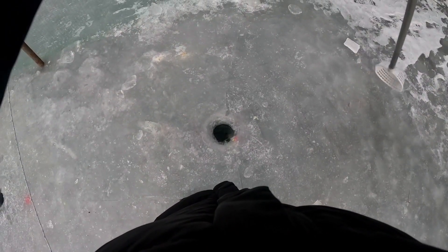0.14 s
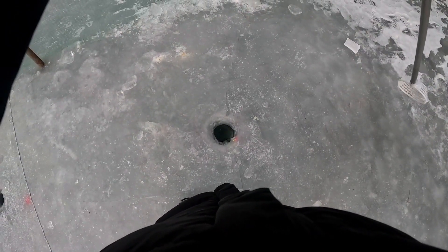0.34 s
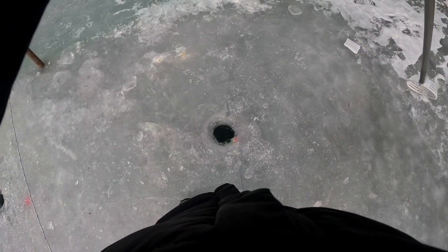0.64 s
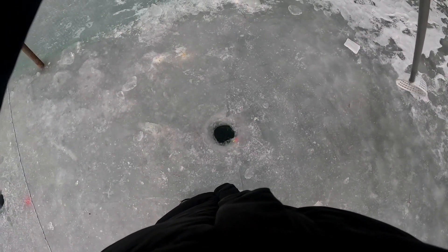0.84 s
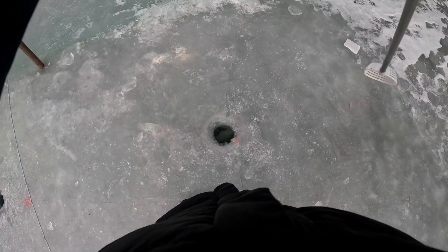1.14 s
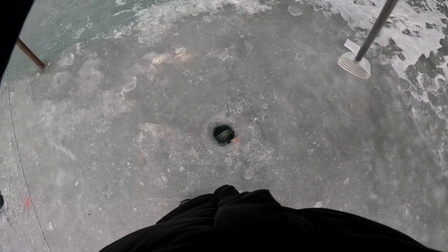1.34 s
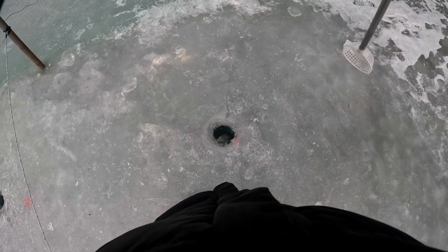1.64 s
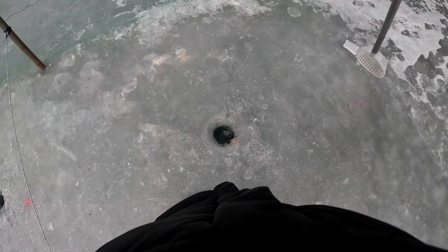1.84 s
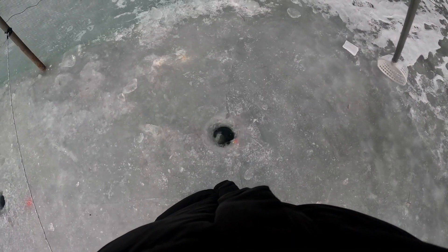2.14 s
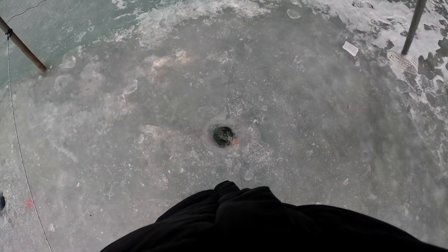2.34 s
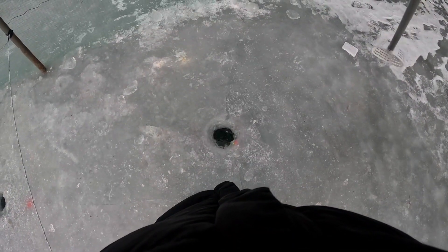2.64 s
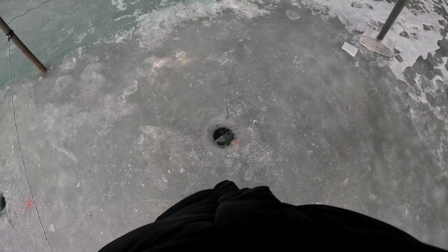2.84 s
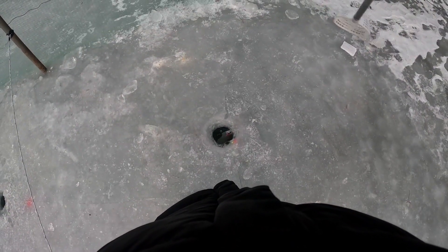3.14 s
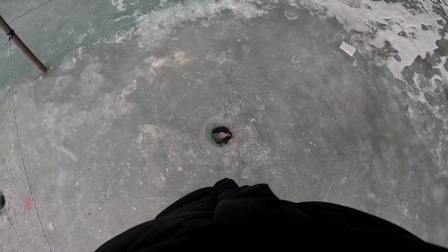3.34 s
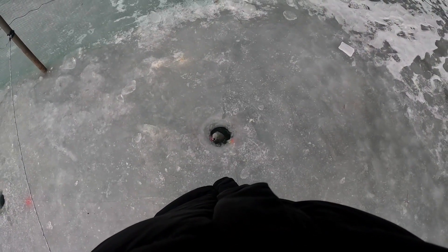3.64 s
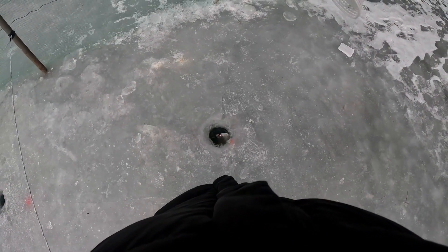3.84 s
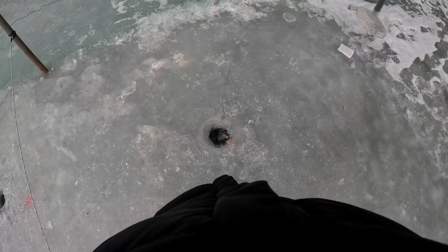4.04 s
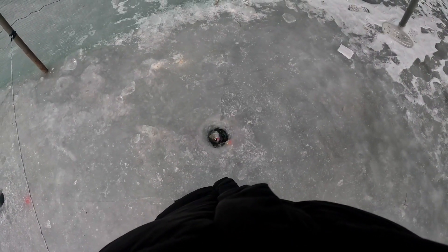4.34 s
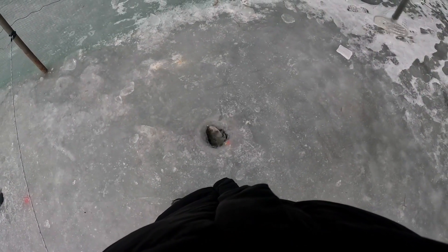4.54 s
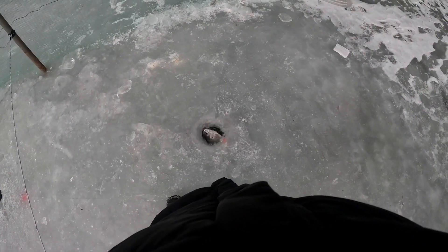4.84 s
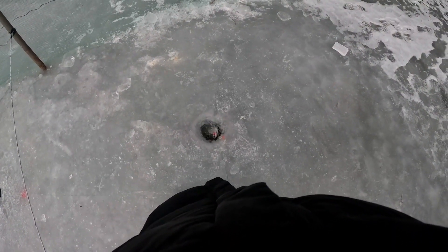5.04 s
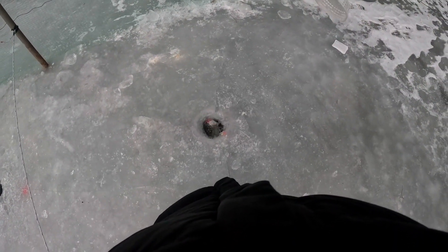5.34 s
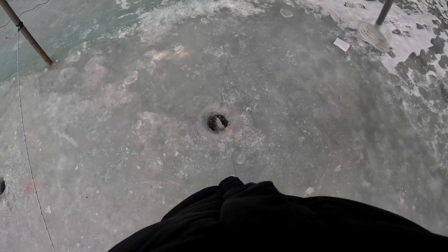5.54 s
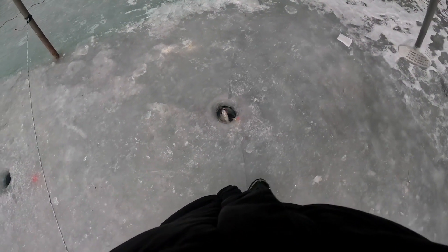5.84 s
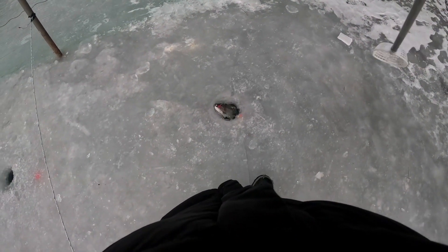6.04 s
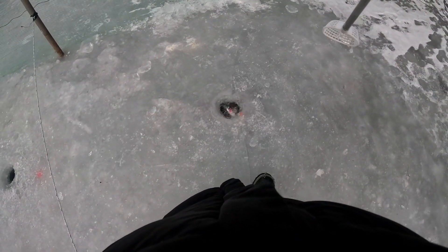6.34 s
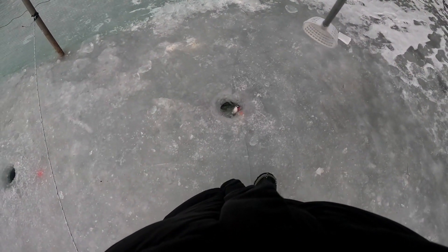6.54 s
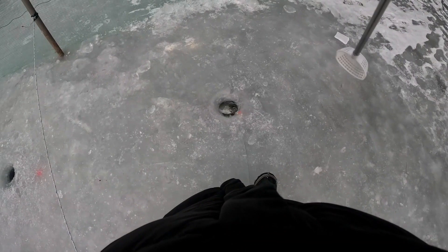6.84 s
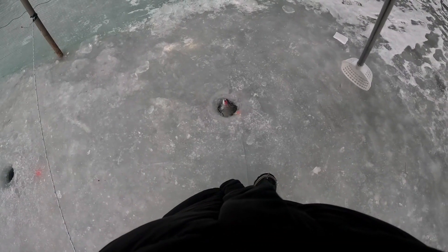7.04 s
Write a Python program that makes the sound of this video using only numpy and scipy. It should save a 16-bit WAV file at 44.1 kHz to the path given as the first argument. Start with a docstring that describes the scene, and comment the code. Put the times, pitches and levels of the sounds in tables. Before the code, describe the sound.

Bright, rapid reel clicking swells with each handle push while wind thumps softly, cloth rustles, water plips, and a dull bump lands at the end.

```python
"""On lake ice an angler winds in line at a hole, with the microphone worn on the chest.
The ratchet's teeth excite damped metal modes, in surges set by each push on the handle.
Shaped noise makes the background hiss, wind, jacket rub, dull puffs and splashes; gliding sines make the plips.
The mount's taps and bump are forces played through its damped modes."""
import sys
import numpy as np
from scipy import signal
from scipy.fft import rfft, irfft
from scipy.io import wavfile
from scipy.ndimage import uniform_filter1d

SR = 44100
rng = np.random.default_rng(int(sys.argv[2]) if len(sys.argv) > 2 else 0)


def file_out(sig):
    """Save sig as 16-bit WAV at sys.argv[1]."""
    # one column per channel
    cols = np.atleast_2d(sig).T
    # limit, then scale
    lim = np.clip(cols, -1, 1)
    pcm = np.round(lim * 32767).astype(np.int16)
    wavfile.write(sys.argv[1], SR, pcm)


N = 316638
TIME = np.arange(N) / SR


def undb(db):
    """Decibels to gain."""
    return 10 ** (np.asarray(db) / 20)


def unit(x):
    """Scale to a peak of 1."""
    return x / np.abs(x).max()


def curves(table):
    """Interpolate each table column over time, one value a sample."""
    time_s, *columns = np.transpose(table)
    return [np.interp(TIME, time_s, column) for column in columns]


def colour(x, points):
    """Filter by a spectrum, interpolated over log frequency."""
    hz, db = np.transpose(points)
    bins_hz = np.maximum(np.arange(N // 2 + 1) * SR / N, 1)
    gain = undb(np.interp(np.log(bins_hz), np.log(hz), db))
    return irfft(rfft(x) * gain, N)


def noise(points):
    """Coloured noise of rms 1."""
    x = colour(rng.standard_normal(N), points)
    return x / x.std()


def walk(rate_hz):
    """Random levels held 1 / rate_hz and slewed; spread near 1."""
    k = max(int(SR / rate_hz), 1)
    held = rng.standard_normal(N)[np.arange(N) // k]
    return np.sqrt(3 / 2) * uniform_filter1d(held, k)


def smooth(x, k):
    """Two running means of k samples."""
    return np.abs(uniform_filter1d(uniform_filter1d(x, k), k))


def even(x, span_s):
    """Hold the rms near 1 over this span, keeping the quicker detail."""
    k = max(int(span_s * SR), 1)
    power = np.mean(np.atleast_2d(x) ** 2, axis=0)
    return x / np.sqrt(smooth(power, k) + 1e-4 * power.mean())


def bell(peak_s, length_s):
    """Bell-shaped gain; length is the full width at 1/e."""
    return np.exp(-(2 * (TIME - peak_s) / length_s) ** 2)


def swells(table, rest_db):
    """Gain of bells whose powers add over a resting level."""
    power = sum((undb(db) * bell(peak_s, length_s)) ** 2 for peak_s, length_s, db in table)
    return np.sqrt(power + undb(rest_db) ** 2)


def impulses(times_s, sizes):
    """One spike at each time."""
    x = np.zeros(N)
    at = np.clip((np.asarray(times_s) * SR).astype(int), 0, N - 1)
    np.add.at(x, at, sizes)
    return x


def ring(modes, rise_s):
    """Stereo response of damped modes to one blow; the vibration takes a moment to spread."""
    t = TIME[:SR // 4]
    sides = np.array([[.5], [-.5]])
    y = 0
    for hz, t60_s, db, pan_db, lead_rad in modes:
        decay = undb(db + sides * pan_db - 60 * t / t60_s)
        y = y + decay * np.sin(2 * np.pi * hz * t + sides * lead_rad)
    return y * (1 - np.exp(-(t / rise_s) ** 2))


def strike(force, response):
    """Play a force through a stereo response."""
    return signal.oaconvolve(force[None], response, axes=1)[:, :N]


def panned_gain(level_db, pan_db):
    """Left and right gains, pan_db apart."""
    return undb(level_db + np.array([[pan_db], [-pan_db]]) / 2)


# background hiss, uneven at the top: (frequency [Hz], relative level [dB])
HISS_SPECTRUM = [(100, 12), (500, -9), (800, -6), (1300, -41), (1800, -7.5), (2400, -17), (3100, -2.5),
                 (4000, -23), (5200, -10.5), (7500, -9), (9300, -11.5), (10500, -25.5), (11700, -24),
                 (13200, -27), (15000, -59)]
# hollow band near 1.1 kHz: (frequency [Hz], relative level [dB])
HOLLOW_SPECTRUM = [(200, -59), (700, -15), (900, -4.5), (1030, 7), (1130, 6.5), (1350, -0.5), (1700, -6),
                   (2400, -11), (4000, -6), (9000, -71)]
# background width: (frequency [Hz], side minus mid [dB])
BACKGROUND_WIDTH = [(200, -4.5), (600, 1), (1100, -8), (1700, 0), (2200, 6), (3200, -11.5), (7000, -0.5)]
# hollow band: (time [s], relative level [dB])
HOLLOW_LEVEL = [(0, -64), (.6, -63.5), (.96, -66.5), (1.68, -63.5), (2.28, -66), (2.64, -65.5), (3.72, -66),
                (4.78, -64), (5.64, -65.5), (5.9, -65), (6.1, -68), (6.5, -61.5), (6.92, -64.5),
                (7.18, -62)]


def background(hiss_db=-63, hollow_db=2, flicker_db=2, swish_db=1):
    """A thin, wide, nearly steady hiss, with a hollow band that swells and flickers."""
    swell_db, = curves(HOLLOW_LEVEL)
    hiss_gain = undb(hiss_db + swish_db * walk(2.25))
    hollow_gain = undb(swell_db + hollow_db + flicker_db * walk(60))
    mid, side = (hiss_gain * noise(HISS_SPECTRUM) + hollow_gain * noise(HOLLOW_SPECTRUM) for _ in range(2))
    side = colour(side, BACKGROUND_WIDTH)
    return np.array([mid + side, mid - side])


# stirs of the water: (start [s], length [s], mean bubble level [dB], middle frequency [Hz])
SLOSH_EVENTS = [(0.587, 0.21, -64, 1210), (4.219, 0.41, -62.5, 1240), (5, 0.26, -77, 1390),
                (5.213, 0.098, -64, 1550), (5.707, 0.13, -66.5, 1390), (6.43, 0.19, -55, 1140),
                (6.897, 0.052, -76, 1260)]


def small_bubbles(count=34, spread=0.19, scatter_db=3, glide_oct_s=5, t60_s=0.021):
    """Each stir frees a group of short bubbles, scattered in pitch and level; rows as in PLIP_EVENTS."""
    rows = []
    for start_s, length_s, db, hz in SLOSH_EVENTS:
        draws = zip(rng.random(count), rng.standard_normal((count, 3)))
        for when, (size, pitch, bend) in draws:
            bubble_hz = hz * np.exp(spread * pitch)
            glide = glide_oct_s * (1 + bend)
            rows.append((start_s + when * length_s, db + scatter_db * size, bubble_hz, glide, t60_s))
    return rows


# plips: (time [s], peak before pan [dB], start frequency [Hz], glide [octaves/s], t60 [s])
PLIP_EVENTS = [(0.737, -53, 1063, 4, 0.08), (0.757, -52, 1100, 13, 0.05), (1.638, -46, 980, 10, 0.015),
               (2.255, -53, 1100, -9, 0.03), (2.639, -37.5, 1092, 18.5, 0.051),
               (4.251, -48, 1196, 3, 0.036), (4.708, -47, 1070, 0, 0.037), (5.010, -57, 1420, 52, 0.044),
               (5.053, -55, 1620, 29, 0.044), (5.079, -47, 1084, 31, 0.045), (5.131, -50, 1060, 12, 0.05),
               (5.199, -49.5, 1175, 11, 0.036), (5.222, -43, 1294, 0, .035), (5.317, -57, 1860, 37, .04),
               (5.337, -43.5, 1310, -12, 0.094), (5.402, -59, 1950, 20, 0.032),
               (6.463, -46.5, 1260, 6, 0.067), (6.645, -54, 1130, 10, 0.042),
               (7.059, -36, 1136, 3.5, 0.051)]


def water(level_db=0, swell_s=0.0024, pan_db=3.5):
    """Bubbles ring briefly in the hole, most of them rising in pitch as they surface."""
    out = np.zeros(N)
    t = TIME[:SR // 16]
    for time_s, db, hz, glide_oct_s, t60_s in list(PLIP_EVENTS) + small_bubbles():
        shape = (1 - np.exp(-(t / swell_s) ** 2)) * np.exp(-np.log(1000) * t / t60_s)
        phase = 2 * np.pi * np.cumsum(hz * 2 ** (glide_oct_s * t)) / SR
        plip = undb(db + level_db) * unit(shape) * np.sin(phase)
        start = int(time_s * SR)
        out[start:start + len(t)] += plip[:N - start]
    return out * panned_gain(0, pan_db)


# spray: (frequency [Hz], relative level [dB])
SPRAY_SPECTRUM = [(600, -25), (1100, -12.5), (1350, -0.5), (1650, -11), (2050, -1.5), (2500, -43),
                  (4500, -39)]
# slaps on the rim: (peak time [s], length [s], level before pan [dB])
SPLASH_SWELLS = [(0.668, 0.01, -58), (0.774, .012, -59), (1.073, 0.013, -59.5), (2.186, 0.0093, -57),
                 (2.658, 0.013, -66), (5.045, 0.028, -69), (5.25, 0.2, -70), (5.226, .009, -50),
                 (5.243, 0.0081, -49.5), (5.252, 0.0088, -61), (5.292, 0.028, -62), (5.359, 0.0082, -56),
                 (5.777, 0.013, -57), (6.47, 0.036, -64), (6.57, 0.099, -64), (6.93, .014, -58)]


def splashes(level_db=0, grain_db=4, pan_db=3):
    """Water slaps the rim of the hole and breaks into a grainy spray."""
    spray = even(noise(SPRAY_SPECTRUM) * undb(grain_db * walk(400)), .01)
    return spray * swells(SPLASH_SWELLS, -110) * panned_gain(level_db, pan_db)


# slow air pressure: (frequency [Hz], relative level [dB])
HEAVE_SPECTRUM = [(4, -55), (12, 7.5), (20, 5), (30, -8), (42, -30.5), (70, -44), (400, -110)]
# slow heaves: (peak time [s], length [s], level [dB])
HEAVE_SWELLS = [(0.31, 0.31, -29), (0.57, 0.074, -32), (0.82, 0.18, -32), (1.09, 0.15, -29.5),
                (1.47, 0.38, -27.5), (2.29, 0.59, -33), (2.94, 0.74, -32.5), (3.41, 0.11, -31.5),
                (3.74, 0.24, -31), (4.13, 0.1, -33), (4.42, 0.3, -29.5), (4.88, 0.31, -30.5),
                (5.13, 0.12, -27.5), (5.38, 0.21, -31), (5.93, 0.26, -27.5), (6.08, 0.11, -24.5),
                (6.27, 0.17, -28), (6.6, 0.27, -28.5)]
# flutter: (frequency [Hz], relative level [dB])
GUST_SPECTRUM = [(15, -39), (30, 8.5), (42, 1), (55, -4), (80, -13), (160, -25), (400, -88), (3000, -110)]
# puffs of air at the microphone: (peak time [s], length [s], relative level [dB])
GUST_SWELLS = [(0.1, 0.31, -36), (0.4, 0.77, -50), (0.83, 0.16, -42), (1.09, 0.25, -45), (1.5, 0.22, -48.5),
               (1.8, 0.3, -46), (2.24, 0.16, -37.5), (2.49, 0.11, -40.5), (2.64, 0.13, -44),
               (2.95, 0.15, -36), (3.21, 0.097, -45), (3.65, 0.092, -40), (3.91, 0.042, -37.5),
               (4.33, 0.065, -41), (4.43, 0.098, -40), (4.65, 0.17, -36.5), (4.78, 0.39, -50),
               (5.1, 0.091, -36), (5.36, 0.034, -34.5), (5.86, 0.3, -35.5), (6.03, 0.13, -34.5),
               (6.2, 0.3, -59), (6.4, 0.24, -45), (6.58, 0.1, -35.5), (6.77, 0.38, -43.5),
               (7.07, 0.28, -45)]
# broken-up air: (frequency [Hz], relative level [dB])
TURBULENCE_SPECTRUM = [(100, 12), (330, 2.5), (700, -7), (1300, -28), (3000, -46), (8000, -90)]


def buffeting(heave_db=0, calm_db=-44, gust_db=-1, breeze_db=-57, turbulence_db=-31):
    """Large eddies heave alike on both sides, smaller ones flutter; turbulence follows their strength."""
    heave = even(noise(HEAVE_SPECTRUM), .06) * swells(HEAVE_SWELLS, calm_db) * undb(heave_db)
    gust = even(noise(GUST_SPECTRUM), .03) * swells(GUST_SWELLS, breeze_db) * undb(gust_db)
    turbulence = noise(TURBULENCE_SPECTRUM) * np.abs(heave + gust) ** 1.52 * undb(turbulence_db)
    return heave + gust + turbulence


# strong eddies: (peak time [s], length [s], peak level [dB], flapping frequency [Hz])
EDDY_EVENTS = [(0.834, 0.051, -22, 35.8), (1.415, 0.068, -22, 21.8), (2.955, 0.041, -21, 35.7),
               (3.189, 0.043, -35, 40), (3.653, 0.13, -31, 30.8), (5.116, 0.064, -27.5, 35.6),
               (6.048, 0.11, -25.5, 44.3), (6.601, 0.034, -24.5, 37.3)]


def eddies(level_db=0):
    """Single strong eddies roll over the microphone as short bursts of low flapping."""
    out = np.zeros(N)
    for peak_s, length_s, db, hz in EDDY_EVENTS:
        phase = 2 * np.pi * rng.random()
        flap = np.sin(2 * np.pi * hz * (TIME - peak_s) + phase)
        out += undb(db + level_db) * bell(peak_s, length_s) * flap
    return out


# rubbing cloth: (frequency [Hz], relative level [dB])
JACKET_SPECTRUM = [(40, -65), (75, 0), (110, -3), (155, 2), (225, -1.5), (300, -13), (430, -24.5),
                   (900, -32), (2500, -73)]
# strokes against the housing: (peak time [s], length [s], level [dB])
RUB_SWELLS = [(0.04, 0.2, -51.5), (0.38, 0.39, -51), (0.63, 0.15, -51), (0.79, 0.21, -53), (1.2, 0.3, -55),
              (1.55, 0.57, -55.5), (1.77, 0.075, -54.5), (1.94, 0.13, -51.5), (2.08, 0.03, -49.5),
              (2.31, 0.19, -57), (2.51, 0.64, -54), (2.66, 0.1, -50.5), (2.87, 0.7, -59.5),
              (3.33, 0.21, -54.5), (3.67, 0.16, -56.5), (3.92, 0.3, -57.5), (4.4, 0.21, -50),
              (4.55, 0.12, -51), (4.7, 0.34, -51.5), (5.06, 0.15, -55), (5.34, 0.19, -54),
              (5.8, 0.5, -55.5), (6.0, 0.61, -57.5), (6.39, 0.15, -54), (6.56, 0.34, -49),
              (6.82, 0.065, -48.5), (7.0, 0.52, -52)]


def jacket_rub(rub_db=0, touch_db=-64, catch_db=4.5):
    """The jacket strokes the microphone housing in small, irregular catches."""
    rub = even(noise(JACKET_SPECTRUM) * undb(catch_db * walk(70)), 0.087)
    return rub * swells(RUB_SWELLS, touch_db) * undb(rub_db)


# dull puffs: (frequency [Hz], relative level [dB])
PUFF_SPECTRUM = [(50, -8), (120, -2.5), (230, 1.5), (330, -12), (500, -20.5), (800, -25.5), (2000, -58)]
# dull puffs: (peak time [s], length [s], level [dB])
PUFF_SWELLS = [(0.464, 0.013, -50), (0.51, .014, -51), (0.612, 0.012, -48), (0.825, 0.042, -47),
               (1.223, .012, -48), (2.266, 0.018, -47.5), (2.528, 0.0089, -49), (3.281, 0.015, -45.5),
               (3.303, 0.009, -48), (3.334, .014, -47), (4.568, .014, -58), (4.678, 0.014, -50),
               (4.714, .016, -53), (6.38, 0.0053, -47), (6.575, .025, -49), (6.805, 0.015, -63)]


def dull_puffs(level_db=0):
    """Short dull puffs, of cloth or of a gust: low-weighted noise in brief bells."""
    puff = even(noise(PUFF_SPECTRUM), .012)
    return puff * swells(PUFF_SWELLS, -110) * undb(level_db)


def rattle(times_s, sizes, grit_db, grit_s):
    """Blows, each followed by a brief decaying scrape."""
    blows = impulses(times_s, sizes)
    decay = signal.lfilter([1], [1, -np.exp(-1 / (grit_s * SR))], blows)
    return blows + undb(grit_db) * decay * rng.standard_normal(N)


# taps: (time [s], click level [dB], body level [dB])
TAP_EVENTS = [(5.9045, -43.5, -56), (5.952, -42, -50), (5.959, -58, -40.5), (5.971, -56, -48),
              (5.9945, -37.5, -41.5), (6.0167, -36.5, -48), (6.0350, -25.5, -42), (6.042, -51, -54),
              (6.501, -65, -55), (6.548, -53, -61), (7.1035, -27.5, -33), (7.106, -45, -51)]
# mount's plastic: (frequency [Hz], t60 [s], relative level [dB], left minus right [dB], left lead [rad])
PLASTIC_MODES = [(584, 0.0085, 10, -4, 0.9), (800, 0.0056, -10, 4, 0.9), (1200, 0.0075, 26, 2.5, -0.47),
                 (1363, 0.016, 10, -6, -0.62), (1610, 0.0033, 21, -7, -0.45)]
# mount's hollow body: (frequency [Hz], t60 [s], relative level [dB], left minus right [dB], left lead [rad])
HOLLOW_BODY_MODES = [(473, 0.021, -2, 2, .3), (610, 0.019, -1, 10, 0.58), (646, 0.02, -14, 2, .6)]


def mount_taps(tap_db=0, body_db=0, grit_db=-22, grit_s=0.0052, rise_s=0.001):
    """The plastic mount slips with light taps: clicks in the plastic, knocks in its hollow body."""
    times_s, click_db, knock_db = np.transpose(TAP_EVENTS)
    click_force = rattle(times_s, undb(click_db + tap_db), grit_db, grit_s)
    knock_force = rattle(times_s, undb(knock_db + body_db), grit_db, grit_s)
    clicks = strike(click_force, unit(ring(PLASTIC_MODES, rise_s)))
    knocks = strike(knock_force, unit(ring(HOLLOW_BODY_MODES, rise_s)))
    return clicks + knocks


# a lean, then a blow: (time [s], peak level [dB], contact [s])
BUMP_EVENTS = [(7.0974, -23, 0.012), (7.1049, -6.5, 0.0052)]
# housing on its strap: (frequency [Hz], t60 [s], relative level [dB], left minus right [dB], left lead [rad])
STRAP_MODES = [(151, 0.013, 10, 1, 0), (51, 0.06, 1, 0, 0)]
# scuff: (frequency [Hz], relative level [dB])
SCUFF_SPECTRUM = [(300, 6), (520, -2), (660, 9), (850, 1), (1400, 2), (2500, 1), (3600, -6), (6000, -39)]


def mount_bump(bump_db=0.0, scuff_db=-50, scuff_s=0.008):
    """A soft push sets the housing swinging on its strap; the last contact leaves a decaying scuff."""
    out = np.zeros((2, N))
    for time_s, db, contact_s in BUMP_EVENTS:
        push = np.sin(np.pi * np.minimum(TIME[:SR // 4] / contact_s, 1)) ** 2
        motion = strike(push, ring(STRAP_MODES, 1 / SR))
        response = unit(np.gradient(motion, axis=1))
        out += strike(impulses([time_s], undb(db + bump_db)), response)
    since_s = TIME - BUMP_EVENTS[-1][0]
    scuff_gain = undb(scuff_db) * (since_s > 0) * np.exp(-np.abs(since_s) / scuff_s)
    return out + noise(SCUFF_SPECTRUM) * scuff_gain


# handle pushes: (peak time [s], nominal top rate [teeth/s], speeding up [s], slowing down [s],
# relative pawl level [dB])
HANDLE_PUSHES = [(-0.002, 56.9, 0.021, 0.05, -49), (0.266, 76.0, 0.245, 0.039, -48),
                 (0.583, 89.0, 0.167, 0.063, -48), (0.692, 58.8, 0.027, 0.126, -50.5),
                 (0.962, 96.5, 0.08, 0.078, -49), (1.091, 51.5, 0.02, 0.176, -50.5),
                 (1.384, 48.2, 0.137, 0.02, -50.5), (1.591, 128.2, 0.156, 0.028, -55),
                 (1.82, 60.7, 0.074, 0.122, -50.5), (2.222, 58.2, 0.201, 0.131, -51.5),
                 (2.607, 81.9, 0.146, 0.049, -49.5), (2.903, 52.8, 0.183, 0.181, -49.5),
                 (3.514, 70.3, 0.28, 0.084, -53), (3.797, 84.9, 0.085, 0.128, -52.5),
                 (4.228, 79.4, 0.154, 0.078, -50), (4.496, 81.3, 0.098, 0.13, -53.5),
                 (4.828, 62.4, 0.158, 0.076, -51), (5.208, 101.7, 0.147, 0.034, -51),
                 (5.427, 84.1, 0.078, 0.131, -52), (5.721, 74.3, 0.101, 0.268, -49.5),
                 (6.032, 97.6, 0.079, 0.085, -52), (6.191, 64.2, 0.034, 0.095, -52),
                 (6.543, 84.3, 0.137, 0.051, -52), (6.84, 81.6, 0.204, 0.038, -50.5),
                 (7.062, 79.8, 0.088, 0.252, -48)]
COAST_TEETH_S, PUSH_SHAPE = 13.502, 1.721  # shape: 1 pointed, 2 bell


def winding():
    """Teeth per second: each push speeds the reel up, then it sinks back towards coasting."""
    rate = COAST_TEETH_S
    for peak_s, top, rise_s, fall_s, *_ in HANDLE_PUSHES:
        away = np.abs(TIME - peak_s) / np.where(TIME < peak_s, rise_s, fall_s)
        rate = rate + (top - COAST_TEETH_S) * np.exp(-away ** PUSH_SHAPE)
    return rate


TICK_RISE_S, MODE_DRIFT_DB = .0004, 2.2
SHIFT_AT_S, SHIFT_S = 3.08, 0.54  # start and length of the colour shift


def jangle(force, modes, span_s=.014):
    """Modes take wandering shares of a force while loudness follows it; their balance shifts once."""
    shifted = np.clip((TIME - SHIFT_AT_S) / SHIFT_S, 0, 1)
    y = 0
    for *mode, shift_db in modes:
        share = undb(shift_db * shifted + MODE_DRIFT_DB * walk(24))
        y = y + strike(force * share, ring([mode], TICK_RISE_S)[:, :SR // 50])
    effort = np.sqrt(smooth(force ** 2, int(span_s * SR)))
    return even(y, span_s) * effort * y.std() / force.std()


# little bass from a small reel, uneven treble: (frequency [Hz], gain [dB])
REEL_RADIATION = [(1200, -9), (2500, -9.5), (2900, -2), (3300, -0.5), (3560, -7.5), (3800, 0), (4300, -2),
                  (5200, -3), (6500, 3), (8200, 4), (8600, 3), (9300, 4.5), (10300, -14.5), (11600, 4.5),
                  (14000, -1)]


def buzz(force, modes, table, rest_db):
    """A part of the reel rings briefly at every tooth, swelling and fading."""
    ticks = even(colour(jangle(force, modes), REEL_RADIATION), .07)
    return ticks * swells(table, rest_db)


RING_RISE_S = .0025


def sing(times_s, modes, table, rest_db, level_db, waver_db):
    """A metal part kept ringing by uneven blows from the teeth; it swells and wavers."""
    blows = impulses(times_s, undb(4 * rng.standard_normal(len(times_s))))
    tone = even(strike(blows, ring(modes, RING_RISE_S)), .035)
    return tone * swells(table, rest_db) * undb(level_db + waver_db * walk(22))


FIRST_TOOTH, TOOTH_SCATTER_DB = .05, 1.4  # part of a tooth passed at the start; blow scatter
WHEEL_TEETH, BITE_TOOTH, BITE_SWING_DB = 18, 4.2, 3.5  # the bite peaks twice a turn
# pawl, housing and frame: (frequency [Hz], t60 [s], relative level [dB], left minus right [dB],
# left lead [rad], change after the shift [dB])
PAWL_METAL = [(6273, 0.0094, -2.5, -4, 0.17, -4.5), (6976, 0.0035, -8.5, -1, -0.34, 16),
              (7410, 0.0055, 2.5, 2, -0.11, -4), (7720, 0.014, -8, -1, -0.13, -2),
              (8530, 0.0047, -5.5, -1.5, -0.1, -7), (11100, 0.0017, -11, 22, -0.8, -0.5)]
HOUSING_METAL = [(3004, 0.02, -17, 2, -1.28, 1), (3185, 0.013, -8.5, -3.5, 0.4, -3.5)]
FRAME_METAL = [(3972, 0.0099, -4.5, -1, 1, -2.5), (4620, 0.017, -35, -14, 0.56, 7.5)]
# long metal modes, lower, upper and a second upper ring at 9607 Hz: first five columns as above
LOW_METAL = [(6309, .13, 0, 0, .1), (6332, .05, -10, 0, .1), (6400, .07, -16, 0, 0)]
HIGH_METAL = [(9425, .15, 0, .5, .2), (9607, .11, -17, .5, .2), (13754, .1, -33, 0, 0),
              (14400, .1, -35, 0, 0), (14580, .1, -35, 0, 0)]
SECOND_HIGH_METAL = [(9607, .13, 0, .5, .2)]
# swells of those parts: (peak time [s], length [s], relative level [dB])
HOUSING_LEVELS = [(0.01, 0.11, -56), (0.266, 0.19, -57), (0.59, 0.28, -58.5), (0.938, 0.21, -57.5),
                  (1.15, 0.22, -58), (1.32, 0.33, -63.5), (1.498, 0.24, -57.5), (1.82, 0.31, -61.0),
                  (2.234, 0.19, -59), (2.58, 0.14, -56.5), (2.926, 0.17, -60.5), (3.427, 0.32, -59.5),
                  (3.787, 0.3, -57.5), (4.008, 0.06, -63), (4.18, 0.38, -59), (4.454, 0.34, -60.0),
                  (4.747, 0.26, -61.5), (5.14, 0.25, -61), (5.44, 0.2, -59), (5.75, 0.33, -60.0),
                  (5.985, 0.33, -58.5), (6.224, 0.18, -58.5), (6.556, 0.27, -58.0), (6.846, 0.2, -56.0),
                  (7.17, 0.28, -57)]
FRAME_LEVELS = [(.62, 1, -71), (2.02, 0.11, -66.5), (3.25, 0.21, -71), (3.53, 0.13, -63.5),
                (5.45, 0.22, -67), (5.85, 0.48, -67), (7.12, 0.26, -66)]
LOW_LEVELS = [(0.01, 0.4, -60.5), (0.13, 0.029, -51.5), (0.259, 0.03, -43), (0.295, 0.14, -52.5),
              (0.47, 0.11, -61.5), (0.585, 0.044, -41.5), (0.687, 0.11, -53.5), (0.848, 0.048, -56),
              (0.96, 0.094, -48), (1.232, 0.12, -53), (1.333, 0.037, -54), (1.415, 0.053, -57),
              (1.508, 0.045, -49.5), (1.545, 0.16, -56), (1.812, 0.19, -53.5), (2.01, 0.06, -55),
              (2.188, 0.17, -57), (2.378, 0.17, -68), (2.569, 0.073, -50.5), (2.94, 0.064, -55.5),
              (3.058, 0.077, -61), (3.434, 0.22, -65.5), (3.734, 0.079, -55.5), (4.073, 0.14, -64),
              (4.473, 0.21, -63.5), (4.709, 0.053, -53.5), (4.859, 0.056, -60), (5.138, 0.1, -58.5),
              (5.435, 0.088, -54), (5.778, 0.11, -59), (6.0, 0.076, -61), (6.31, 0.49, -68.5),
              (6.59, 0.18, -63), (6.837, 0.024, -52.5), (7.07, 0.18, -57.5), (7.158, 0.067, -54)]
HIGH_LEVELS = [(0.23, 0.18, -66.5), (0.531, 0.15, -72), (0.71, 0.15, -68.5), (1.6, 0.29, -70),
               (1.91, 0.11, -61.5), (2.04, 0.071, -62), (2.11, 0.034, -52), (2.2, 0.061, -57),
               (2.34, 0.11, -58.5), (2.55, 0.22, -62.5), (2.83, 0.087, -60.5), (2.99, 0.08, -65),
               (3.1, 0.063, -68.0), (3.24, 0.074, -63.5), (3.39, 0.055, -62), (3.55, 0.1, -62.5),
               (3.84, 0.19, -76), (4.01, 0.05, -70), (4.23, 0.021, -63), (4.39, 0.075, -67),
               (4.53, 0.14, -66), (4.76, 0.4, -69.5), (5.18, 0.072, -64), (5.46, 0.42, -71.5),
               (5.65, 0.14, -64.5), (5.77, 0.051, -65), (5.95, 0.3, -70.5), (6.31, 0.15, -71),
               (6.52, 0.053, -59), (6.76, 0.35, -71.5), (6.99, 0.043, -58), (7.2, 0.15, -57.5)]
SECOND_HIGH_LEVELS = [(.13, 0.088, -67), (2.2, 0.98, -88), (3.47, 0.13, -78), (4.56, 0.13, -69),
                      (5.17, 0.12, -67), (5.45, 0.05, -63), (6.0, .12, -81), (6.53, 0.071, -85),
                      (6.8, 0.14, -73), (7.06, 0.12, -69)]


def reel(pawl_db=6.0, housing_db=2.0, frame_db=2.5, bounce_s=0.00071, bounce_db=-8,
         scrape_db=-16.5, scrape_s=0.0031, scrape_lag_s=0.00068, slip_s=0.00025):
    """The pawl drops off each tooth, bounces and scrapes; housing and frame tick along and the metal rings on."""
    passed = FIRST_TOOTH + np.cumsum(winding()) / SR
    *_, push_db = curves(HANDLE_PUSHES)
    bite = np.cos(4 * np.pi * (passed - BITE_TOOTH) / WHEEL_TEETH)
    times_s = TIME[np.flatnonzero(np.diff(np.floor(passed)))]
    scatter, delay, rebound, slip = rng.standard_normal((4, len(times_s)))
    times_s = times_s + slip_s * slip
    size = undb(TOOTH_SCATTER_DB * scatter)

    drops = impulses(times_s, size)
    bounces = impulses(times_s + bounce_s * np.exp(.3 * delay), size * undb(bounce_db + 2 * rebound))
    scrape_window = np.hanning(int(scrape_s * SR) + 3)
    contact = signal.oaconvolve(impulses(times_s + scrape_lag_s, size), scrape_window, "same")
    force = drops + bounces + undb(scrape_db) * contact * rng.standard_normal(N)

    pawl_gain = undb(pawl_db + push_db + BITE_SWING_DB * bite)
    pawl = colour(jangle(force * pawl_gain, PAWL_METAL), REEL_RADIATION)
    housing = buzz(force, HOUSING_METAL, HOUSING_LEVELS, rest_db=-73.5) * undb(housing_db)
    frame = buzz(force, FRAME_METAL, FRAME_LEVELS, rest_db=-68.5) * undb(frame_db)
    low = sing(times_s, LOW_METAL, LOW_LEVELS, rest_db=-74.5, level_db=6.0, waver_db=3.0)
    high = sing(times_s, HIGH_METAL, HIGH_LEVELS, rest_db=-79.5, level_db=3.5, waver_db=4.0)
    second_high = sing(times_s, SECOND_HIGH_METAL, SECOND_HIGH_LEVELS, rest_db=-80, level_db=0, waver_db=3)
    return pawl + housing + frame + low + high + second_high


def scene():
    """Everything is close by and in the open, so there is no echo."""
    hole = water() + splashes()
    wind = buffeting() + eddies()
    mount = mount_taps() + mount_bump()
    return background() + hole + wind + jacket_rub() + dull_puffs() + mount + reel()


def record(dry, top_hz=15000):
    """The recorder cuts the top with a steep low-pass."""
    low_pass = signal.ellip(8, .2, 70, top_hz, fs=SR, output="sos")
    return signal.sosfilt(low_pass, dry)


dry = scene()
out = record(dry)
file_out(out)
```